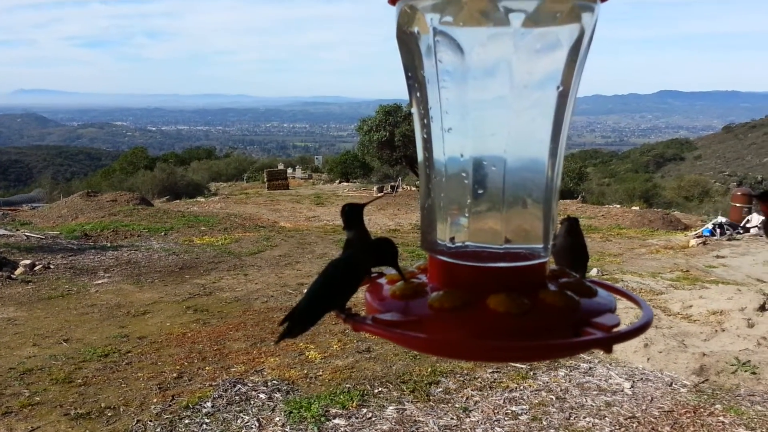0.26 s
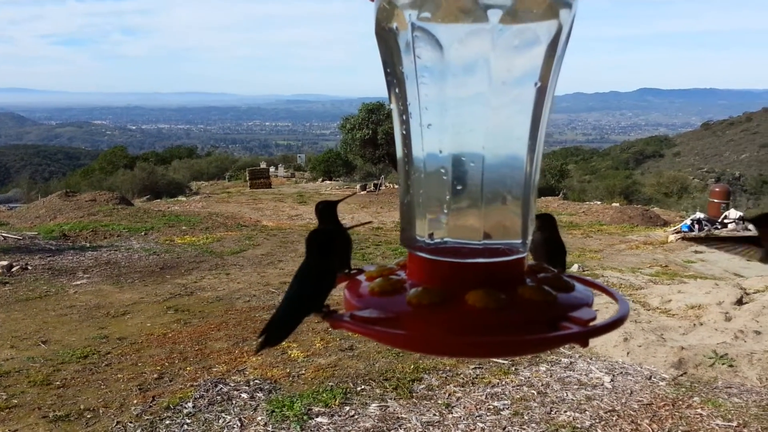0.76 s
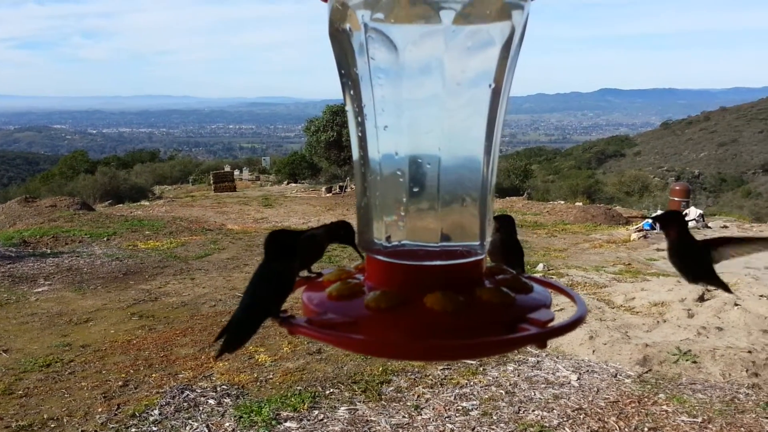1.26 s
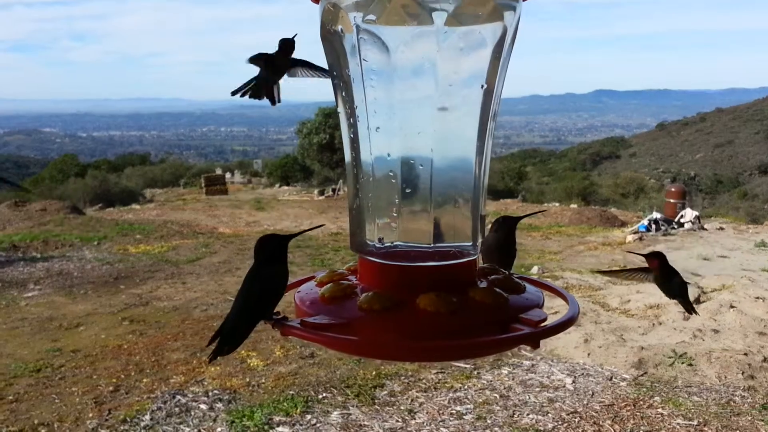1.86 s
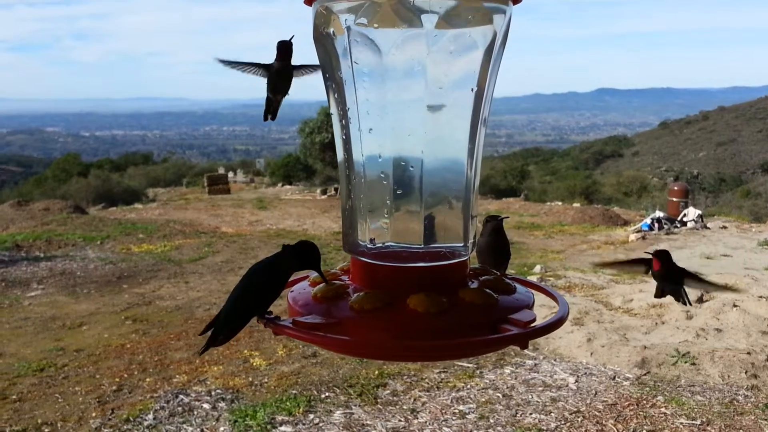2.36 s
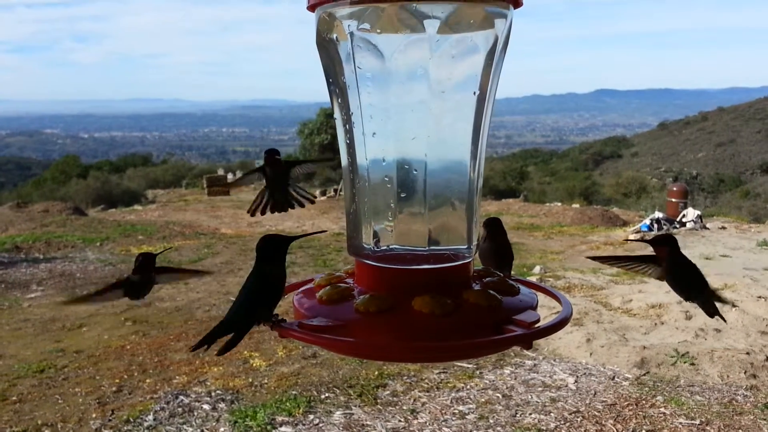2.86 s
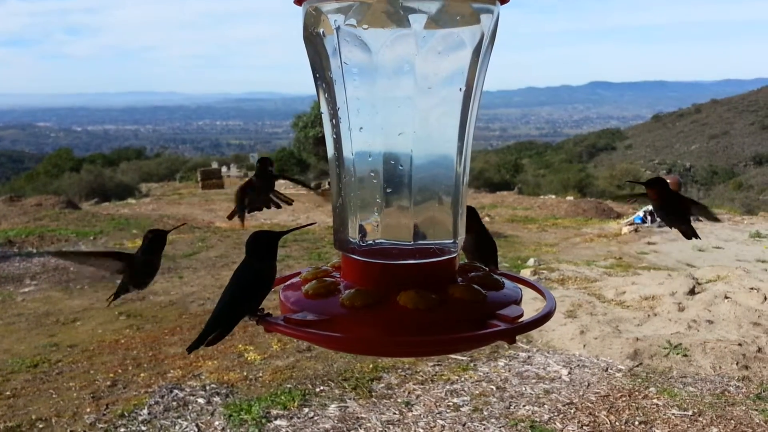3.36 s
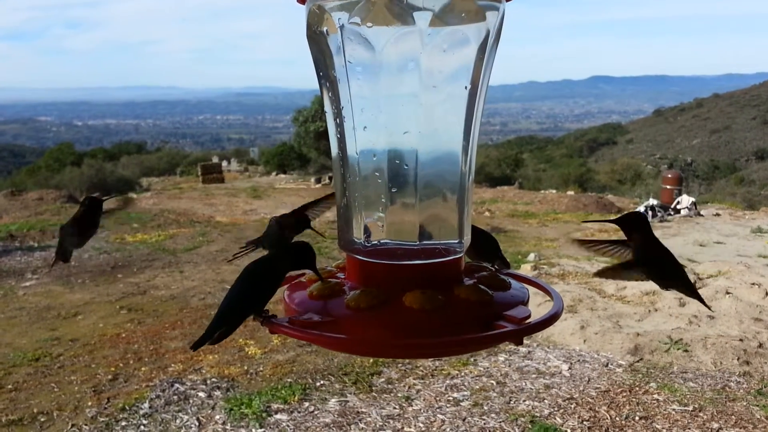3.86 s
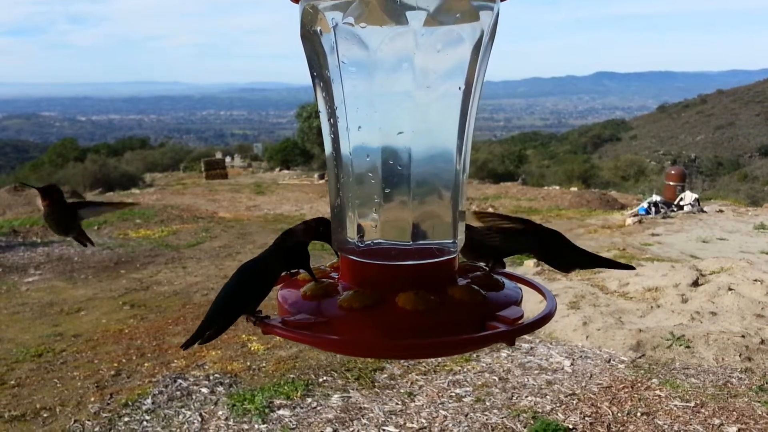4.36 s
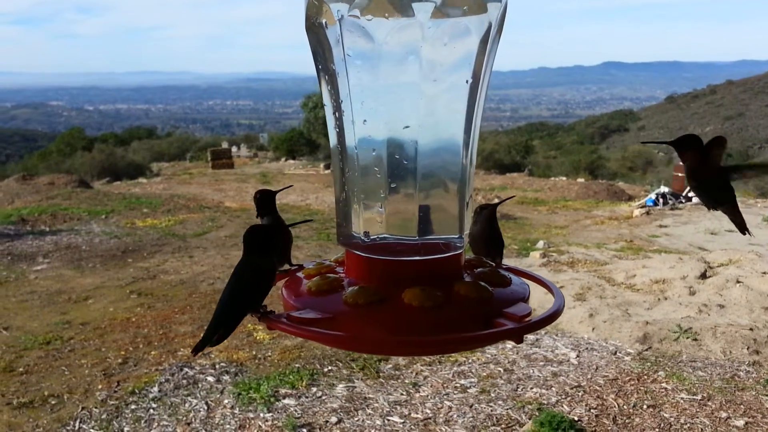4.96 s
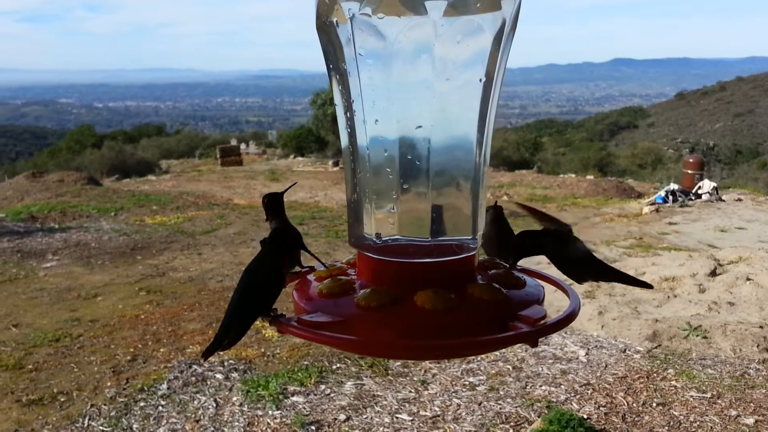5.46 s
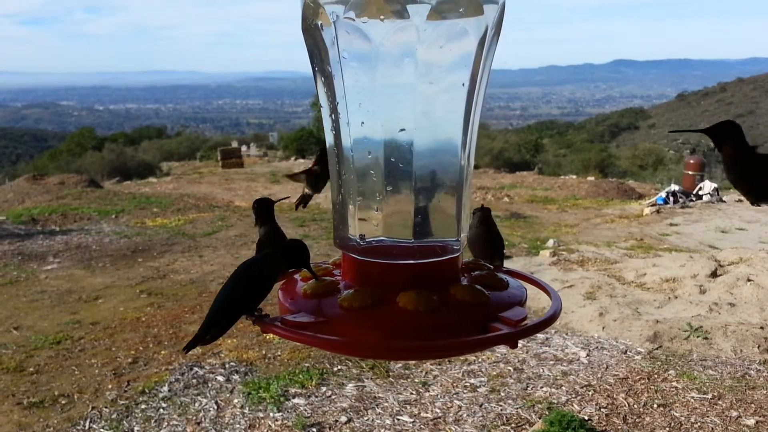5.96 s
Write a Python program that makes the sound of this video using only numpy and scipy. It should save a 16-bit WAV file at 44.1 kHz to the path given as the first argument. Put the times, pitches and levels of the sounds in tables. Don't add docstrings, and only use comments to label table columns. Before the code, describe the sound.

Close outdoor stereo pickup at a hummingbird feeder. A soft low wing thrum opens, then a loud, tiny, piercing chip plunges in pitch. Loud chips keep coming irregularly, sometimes in close pairs, with fainter ones between. Wingbeats swell into humming, airy bursts as birds dart past. Each chip has a brief echo off wall and ground. Low valley rumble, a far engine drone and faint hiss lie behind.

```python
import sys
import numpy as np
from scipy import signal
from scipy.fft import rfft, irfft, next_fast_len
from scipy.io import wavfile
from scipy.ndimage import uniform_filter1d, map_coordinates

SR = 44100
rng = np.random.default_rng(int(sys.argv[2]) if len(sys.argv) > 2 else 0)


def unload_audio(sound):
    columns = np.transpose(np.atleast_2d(sound))
    steps = np.round(np.clip(columns, -1, 1) * 32767)
    wavfile.write(sys.argv[1], SR, steps.astype(np.int16))


def amplitude_ratio(level_db):
    exponent = np.asarray(level_db, float) / 20
    return 10 ** exponent


N = 273420

# frequency in Hz, level in dB per Hz.
AIR_SPECTRUM = [(18, -80), (30, -34), (107, -3), (189, -14), (233, -13.5), (434, -23), (469, -28),
                (608, -39.5), (657, -29.5), (4360, -63.5), (14800, -47.5)]
# frequency in Hz, left-right likeness from 0 to 1.
PORT_LIKENESS = [(60, 0.98), (240, 0.88), (930, 0.16), (3640, 0.021), (14300, 0.13)]
# frequency in Hz, left minus right in dB.
PORT_BALANCE = [(60, 4), (150, 2), (370, 2.5), (930, 2.5), (2310, 5.5), (5750, 1), (14300, -0.5)]

# start in seconds, engine cycles in Hz, level in dB.
ENGINE_DRIFT = [
    (0, 23.68, -56),
    (.35, 23.62, -41.5),
    (.8, 23.85, -51),
    (1.9, 24.1, -41.5),
    (2.3, 24.35, -49),
    (4, 24.4, -43),
    (5.4, 24.6, -46.5),
    (6.2, 24.43, -43),
]
# multiple of the cycle, level in dB.
ENGINE_ORDERS = [(3, -8.5), (4, 6.5), (5, 5.5), (6, -5), (7, -14), (8, -8.5), (9, -11.5), (10, -21.5),
                 (11, -1.5), (12, -15.5), (14, -4)]

# frequency in Hz, level in dB per Hz.
STROKE_SPECTRUM = [(18, -40), (30, -22.5), (75, -7), (102, -6.5), (214, -0.5), (297, -8), (526, -15),
                   (706, -24.5), (1500, -51.5), (1950, -49.5), (3300, -120)]
# frequency in Hz, level in dB per Hz.
FEATHER_SPECTRUM = [(1800, -28), (3000, -12), (3800, -8), (4600, 0), (6000, -2), (7500, -1), (9500, -8),
                    (12500, -12), (14800, -16)]
# time in seconds, thrum level in dB.
HOVER_LEVEL = [
    (0, -52),
    (.5, -52.5),
    (1.05, -55.5),
    (1.5, -52),
    (2.2, -49),
    (3.05, -52),
    (4.3, -49),
    (5.05, -51),
    (5.6, -46.5),
    (6.2, -52.5),
]
# start in seconds, hold in seconds,
# thrum level in dB, swish level in dB.
DART_EVENTS = [(0.0, .02, -43, -68.5), (0.095, .03, -45.5, -63), (0.592, .02, -42, -60),
               (0.7, .07, -39, -63), (1.151, .07, -47, -72), (1.268, .07, -41, -63.5),
               (1.58, .07, -37, -55), (1.67, .07, -36, -57.5), (1.8, .03, -41, -50.5),
               (2.46, .04, -40.5, -58.5), (2.582, .1, -38, -59), (2.8, .07, -34.5, -53),
               (3.11, .05, -40, -63.5), (3.243, .02, -37, -59.5), (3.32, .04, -42, -60.5),
               (3.47, .14, -46, -63), (3.762, .25, -43, -64.5), (4.139, .02, -42.5, -86),
               (4.25, .03, -48.5, -64.5), (4.544, .1, -41, -59), (4.809, .07, -42.5, -65.5),
               (5.155, .02, -46.5, -60), (5.282, .08, -43.5, -61), (5.463, 0.025, -47.5, -63),
               (5.58, .02, -48, -65.5), (5.71, .02, -46.5, -56.5), (5.787, 0.049, -36.5, -61.5),
               (6.18, .04, -43, -66.5)]

# time in seconds, peak in dB, left minus right in dB.
BILL_TICKS = [
    (0.1154, -34.5, -13.5),
    (1.1835, -52, -8.5),
    (3.267, -28.5, -6.5),
    (4.618, -55, -18),
    (5.167, -45, 15),
]

# time of passing 7 kHz in seconds, peak in dB, lead-in in ms,
# top pitch in Hz, left minus right in dB.
NEAR_CHIPS = [(0.1315, -3.5, 9.3, 9340, -0.5), (0.6128, -5, 7.3, 9085, -4), (1.197, -6.5, 9.1, 9155, -0.4),
              (1.7803, -7.5, 11, 9080, 3), (2.1613, -8, 8.3, 9230, 1), (2.4694, -7.5, 11, 8960, -0.2),
              (2.5445, -10.5, 7.8, 8704, -1), (3.284, -7, 12, 9150, -2), (3.7085, -9.5, 11, 9055, -6.5),
              (3.7989, -10, 7.8, 8510, -1.5), (4.6427, -8.5, 8.5, 8534, -5), (5.1839, -9, 11, 9090, 2.3),
              (5.3, -8, 8.3, 8990, 5)]
# time of passing 7 kHz in seconds, peak in dB, lead-in in ms,
# top pitch in Hz, left minus right in dB.
FAR_CHIPS = [
    (0.8016, -27.5, 12, 8800, -1),
    (1.3541, -32, 2.8, 10020, -12.5),
    (1.946, -25, 5.2, 9420, -0.5),
    (2.6607, -22.5, 4.6, 9530, -9),
    (3.1594, -29.5, 2.4, 9500, -4.5),
    (3.5929, -26, 2.9, 8520, -8.5),
    (4.266, -40, 2.6, 8300, -17.5),
    (4.745, -28.5, 4.2, 9700, -12.5),
]
# time of passing 7 kHz in seconds,
# peak in dB, lead-in in ms, # top pitch in Hz, left minus right in dB.
LOW_CHIPS = [
    (2.7135, -29.5, 0.77, 8670, -1),
    (3.4795, -27, 0.73, 8790, -0.5),
    (3.9413, -23, 1.1, 8134, -7.5),
    (5.4601, -32.5, 1.8, 8670, -7),
]
# time of passing 7 kHz in seconds, peak in dB,
# lead-in in ms, top pitch in Hz, left minus right in dB.
HIDDEN_CHIPS = [
    (.001, -58, 2.2, 8720, 0.6),
    (2.12, -68.5, 6.6, 9170, 0),
    (2.357, -59, 7.5, 9900, 0.78),
    (2.385, -66, 14, 9880, 2),
    (5.801, -62, 4.4, 8530, 0),
]
# pitch in Hz, level in dB.
SYRINX_LEVEL = [(1500, -45.5), (3000, -23.5), (4500, -18), (5500, -1), (6500, -6), (7500, -0.5), (9900, 1)]
# frequency in Hz, gain in dB.
LEFT_PORT_TONE = [(1300, -45), (2600, -12), (4000, -2), (5500, -1), (6000, 2), (6700, 4.5), (7500, 3),
                  (8000, .5), (8500, -3), (9000, -6), (10500, -4), (14000, -7)]
# frequency in Hz, gain in dB.
RIGHT_PORT_TONE = [(1300, -50), (2600, -17), (4000, -9), (5500, -8), (6500, -8), (7000, 3), (7500, 7.5),
                   (8000, 7.5), (8500, 3), (9000, -2), (10500, -3), (14000, -9)]
# delay in ms, left level in dB, right level in dB.
BOUNCES = [
    (6.1, -17.5, -28.5),
    (13, -21, -19.5),
]
# frequency in Hz, decay time to -60 dB in seconds.
YARD_DECAY = [(3000, 0.45), (8000, 0.2), (10500, .33), (14000, 0.47)]

ARCH_HZ_PER_MS = 185
YARD_EDGE_S, YARD_EDGE_T60_S = .11, .12
DART_RISE_S, DART_T60_S = .03, .28
HOVER_SWISH_DB, HOVER_SWAY_DB = -68.5, 2.5
HOVER_HZ, HZ_PER_DB, BEAT_LAG_S = 48.97, 0.91, .2
HISS_GROWS, HISS_DB = 1.46, -65
HISS_SPLIT_HZ, HISS_PATCHY_DB = 6200, 3


def unit(x):
    return x / np.sqrt(np.mean(x ** 2) + 1e-20)


def along(points, hz):
    f, v = np.transpose(points)
    return np.interp(np.log(hz + 1), np.log(f + 1), v)


def curves(rows):
    s, *cols = np.transpose(rows)
    return [np.interp(np.arange(N) / SR, s, c) for c in cols]


def wobble(rate):
    knots = rng.standard_normal(int(N * rate / SR) + 4)
    return map_coordinates(knots, [np.arange(N) * rate / SR])


def filtered(x, response):
    length = x.shape[-1]
    m = next_fast_len(length + 8192)
    return irfft(rfft(x, m) * response(np.fft.rfftfreq(m, 1 / SR)), m)[..., :length]


def balance(left_minus_right_db):
    return amplitude_ratio([[left_minus_right_db / 2], [-left_minus_right_db / 2]])


def spread(shared, spectrum):
    def mid_side(hz):
        turn = np.arccos(np.clip(along(PORT_LIKENESS, hz), -1, 1)) / 2
        return amplitude_ratio(along(spectrum, hz)) * [np.cos(turn), np.sin(turn)]

    pair = np.array([shared, np.roll(shared, SR // 30)])
    mid, side = filtered(pair, mid_side)
    stereo = np.array([mid + side, mid - side])
    return unit(filtered(stereo, lambda hz: amplitude_ratio(along(PORT_BALANCE, hz) * [[.5], [-.5]])))


def air():
    return amplitude_ratio(-47 + 0.43 * wobble(8.6)) * spread(rng.standard_normal(N), AIR_SPECTRUM)


def engine():
    cycle_hz, level_db = curves(ENGINE_DRIFT)
    phase = 2 * np.pi * np.cumsum(cycle_hz) / SR
    drone = np.zeros(N)
    for order, order_db in ENGINE_ORDERS:
        fading = amplitude_ratio(order_db + 3.3 * wobble(7.8))
        drone += fading * np.sin(order * phase + order + .8 * wobble(5))
    return amplitude_ratio(level_db - 2.5) * unit(drone) * balance(0.6)


def flight():
    start, hold, *peak_db = np.transpose(DART_EVENTS)[..., None]
    t = np.arange(0, N, 64) / SR
    rise = np.clip(1 + (t - start) / DART_RISE_S, 0, 1)
    shape = rise * amplitude_ratio(-60 * np.maximum(t - start - hold, 0) / DART_T60_S)
    hover_thrum_db = curves(HOVER_LEVEL)[0] + HOVER_SWAY_DB * wobble(9)
    hover_swish_db = HOVER_SWISH_DB + .3 * (hover_thrum_db + 52)
    levels = []
    for db, hover_db in zip(peak_db, (hover_thrum_db, hover_swish_db)):
        dart_power = np.sum((amplitude_ratio(db) * shape) ** 2, axis=0)
        dart_power = np.interp(np.arange(N) / SR, t, dart_power)
        levels.append(10 * np.log10(dart_power + amplitude_ratio(hover_db) ** 2))
    return levels


def wings():
    thrum_db, swish_db = flight()
    effort_db = np.maximum(uniform_filter1d(thrum_db, int(BEAT_LAG_S * SR)) + 50, 0)
    beat_hz = HOVER_HZ + HZ_PER_DB * effort_db
    turns = np.cumsum(beat_hz * (1 + .012 * wobble(20))) / SR

    strokes = np.diff(np.floor(2 * turns), prepend=0) * np.where(turns % 1 < .5, 1, .35)
    others = np.diff(np.floor(turns + .25 * wobble(6.7)), prepend=0)
    pulses = unit((strokes + 0.95 * others) * amplitude_ratio(2.6 * rng.standard_normal(N)))
    thrum = spread(pulses + .5 * rng.standard_normal(N), STROKE_SPECTRUM)

    gate = 1 + 0.15 * np.cos(2 * np.pi * turns)
    hiss = spread(gate * amplitude_ratio(.8 * wobble(220)) * rng.standard_normal(N), FEATHER_SPECTRUM)
    dull = filtered(hiss, lambda hz: 1 / (1 + (hz / HISS_SPLIT_HZ) ** 8))
    bright = amplitude_ratio(-0.5) * (hiss - dull)
    hiss = amplitude_ratio(HISS_PATCHY_DB * wobble(18)) * dull + amplitude_ratio(HISS_PATCHY_DB * wobble(14)) * bright

    downwash = spread(gate * rng.standard_normal(N),
                      [(400, -41.0), (700, 0.5), (1500, -3), (2800, -8), (4000, -16.5)])
    hiss_db = HISS_GROWS * (swish_db + 67.5) + HISS_DB
    return amplitude_ratio(thrum_db - 2.0) * thrum + amplitude_ratio(hiss_db) * hiss + amplitude_ratio(swish_db + 3.0) * downwash


def ticks():
    out, t = np.zeros((2, N)), np.arange(SR // 200) / SR
    for s, db, pan_db in BILL_TICKS:
        noise = uniform_filter1d(rng.standard_normal(len(t) + 1), size=3)
        snap = amplitude_ratio(db - 60 * t / 0.0053) * np.diff(noise)
        out[:, round(s * SR):][:, :len(t)] += snap * balance(pan_db)
    return out


def yard_tail():
    length = SR // 5
    hz, t, z = signal.stft(rng.standard_normal((2, length)), SR, nperseg=256)
    fall_db = -60 * t / along(YARD_DECAY, hz)[:, None]
    fall_db = fall_db - 60 * np.maximum(t - YARD_EDGE_S, 0) / YARD_EDGE_T60_S
    tail = signal.istft(z * amplitude_ratio(fall_db), SR, nperseg=256)[1][:, :length]
    tail = tail * (1 + 2.3 * amplitude_ratio(-60 * np.arange(length) / SR / 0.032))
    return np.pad(tail / np.linalg.norm(tail[0]), ((0, 0), (130, 0)))


def surroundings(wet_db):
    space = amplitude_ratio(wet_db) * yard_tail()
    space[:, 0] = 1
    for echo_ms, *echo_db in BOUNCES:
        at = round((echo_ms + rng.normal(0, .25)) * SR / 1000)
        space[:, at] += amplitude_ratio(np.array(echo_db) + rng.normal(0, 3, 2))
    return space


def syrinx(db, lead_ms, top_hz, overtone_db, rasp_db):
    ms = np.arange(-SR // 40, SR // 80) / SR * 1000
    arch_ms = (top_hz - 7000) / ARCH_HZ_PER_MS
    hz = np.maximum(top_hz - (top_hz - 7000) * np.abs(1 + ms / arch_ms) ** 2.5, 900)
    hz = np.maximum(hz - 45 * np.maximum(ms - 1, 0) ** 3, 900)
    phase = 2 * np.pi * np.cumsum(hz) / SR

    onset = np.clip(ms + lead_ms + .8, 0, 1) * amplitude_ratio(np.minimum(3.2 * (ms + lead_ms - 4.2), 0))
    tremble_db = unit(uniform_filter1d(rng.standard_normal(len(ms)), size=60))
    level = amplitude_ratio(db + along(SYRINX_LEVEL, hz) + tremble_db) * onset * (hz > 900)
    waver = unit(uniform_filter1d(rng.standard_normal(len(ms)), size=30))
    octave = amplitude_ratio(db + overtone_db - .7 * (ms - 3.2) ** 2 + 2.5 * waver) * (hz > 2500)
    burst_db = -.12 * (ms - 1) ** 2
    breath = unit(np.diff(rng.standard_normal(len(ms) + 2), n=2))
    rasp = amplitude_ratio(rasp_db + burst_db) * level * breath
    return level * np.sin(phase) + octave * np.sin(2 * phase) + rasp


def chips(rows, overtone_db, lag_ms, wet_db, rasp_db, tilt_db):
    out = np.zeros((2, N + 2 * SR))
    for s, db, lead_ms, top_hz, pan_db in rows:
        call = syrinx(db, lead_ms, top_hz, overtone_db, rasp_db)
        heard = signal.fftconvolve(call[None], surroundings(wet_db), axes=1)
        lag_s = np.array([[lag_ms + rng.normal(0, 0.072)], [0]]) / 1000
        delay = s * SR % 1 / SR + lag_s
        left_tilt_db = tilt_db + (top_hz - 9100) / 260
        tilts = np.array([[left_tilt_db], [tilt_db]])

        def arrival(f):
            tone = amplitude_ratio(tilts * (np.clip(f, 3500, 9500)[None] - 7200) / 1000)
            return balance(pan_db) * tone * np.exp(-2j * np.pi * f * delay)

        heard = filtered(heard, arrival)
        out[:, SR + int(s * SR) - SR // 40:][:, :heard.shape[1]] += heard
    return filtered(out[:, SR:SR + N],
                    lambda f: amplitude_ratio([along(LEFT_PORT_TONE, f), along(RIGHT_PORT_TONE, f)]))


def scene():
    near = chips(NEAR_CHIPS, overtone_db=-7.5, lag_ms=-0.2502, wet_db=-12, rasp_db=-10.5, tilt_db=-0.5)
    far = chips(FAR_CHIPS, overtone_db=-20, lag_ms=0.019, wet_db=-11.0, rasp_db=-6.5, tilt_db=1.0)
    low = chips(LOW_CHIPS, overtone_db=-5, lag_ms=0.98, wet_db=-20, rasp_db=-3.0, tilt_db=-1.5)
    hidden = chips(HIDDEN_CHIPS, overtone_db=-2, lag_ms=0.053, wet_db=24, rasp_db=-4, tilt_db=-1)
    return air() + engine() + wings() + ticks() + near + far + low + hidden


def low_pass(x):
    return signal.sosfilt(signal.butter(12, 14910, fs=SR, output="sos"), x)


def record(dry):
    band = filtered(dry, lambda hz: 1 / (1 + (hz / 14850) ** 60))
    mix = np.clip(band, -1, 1)
    return low_pass(mix)


dry = scene()
out = record(dry)
unload_audio(out)
```